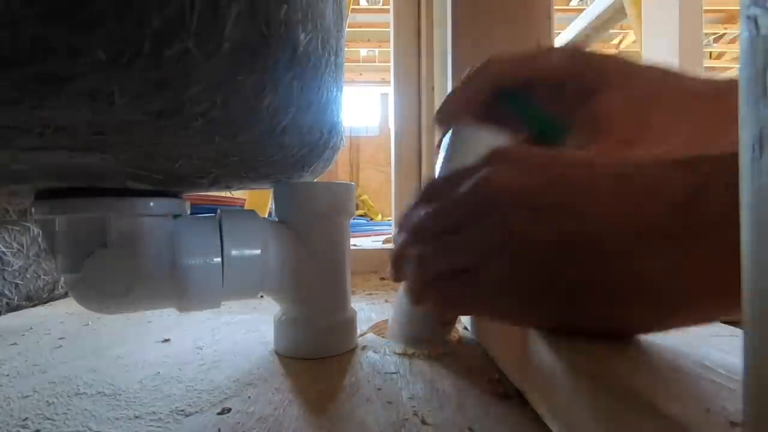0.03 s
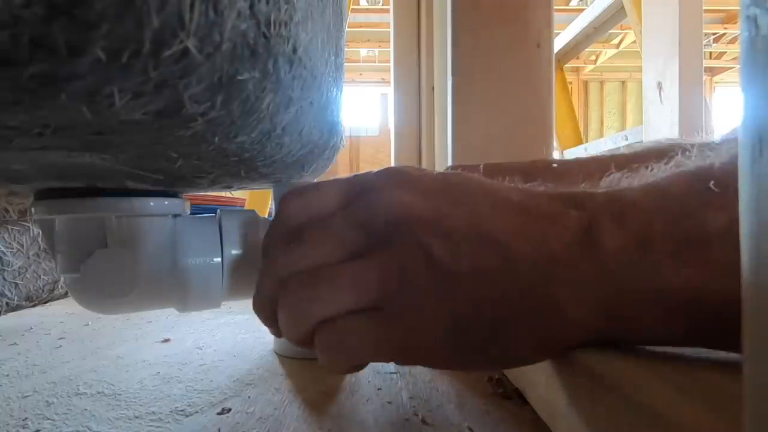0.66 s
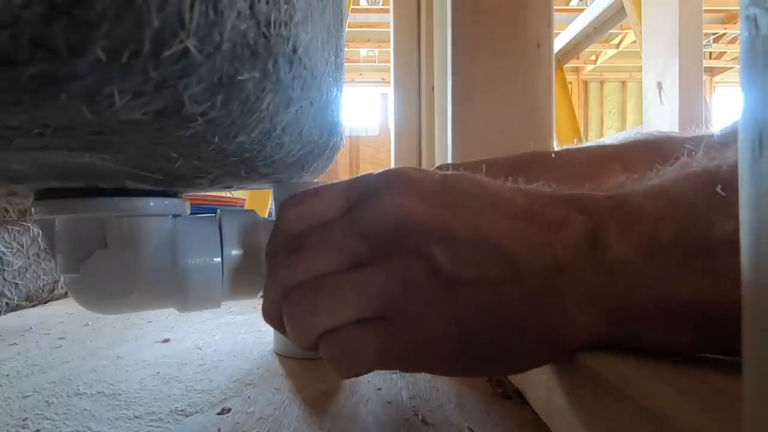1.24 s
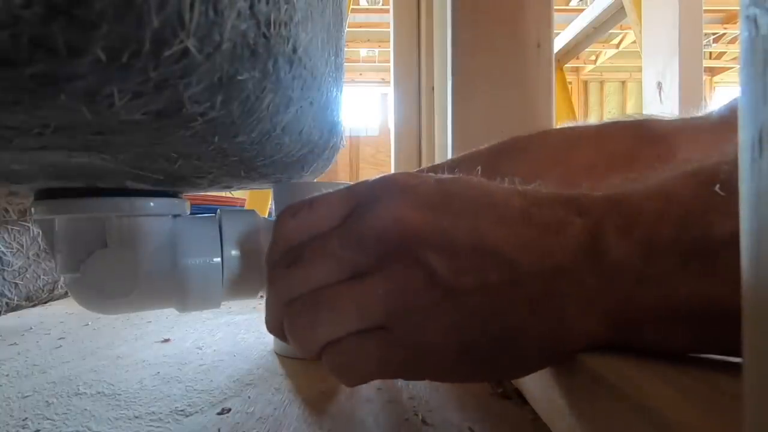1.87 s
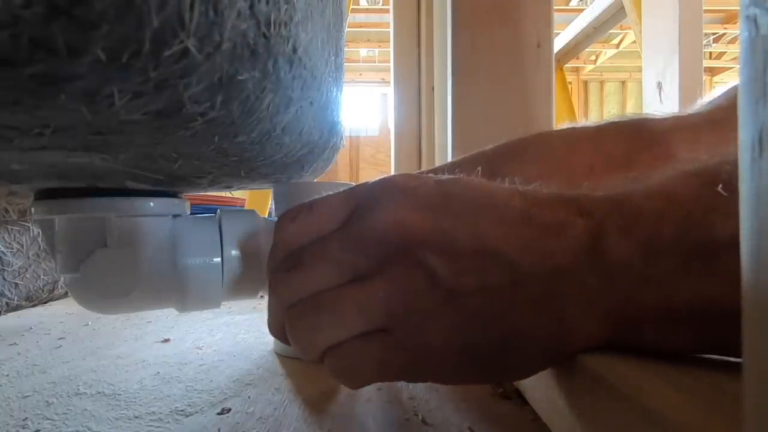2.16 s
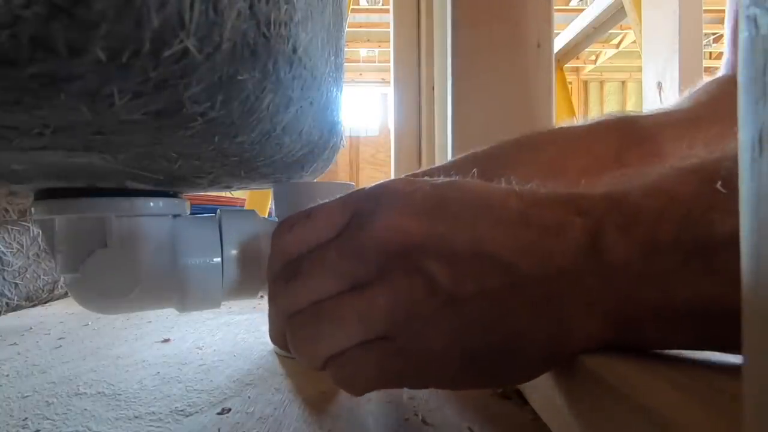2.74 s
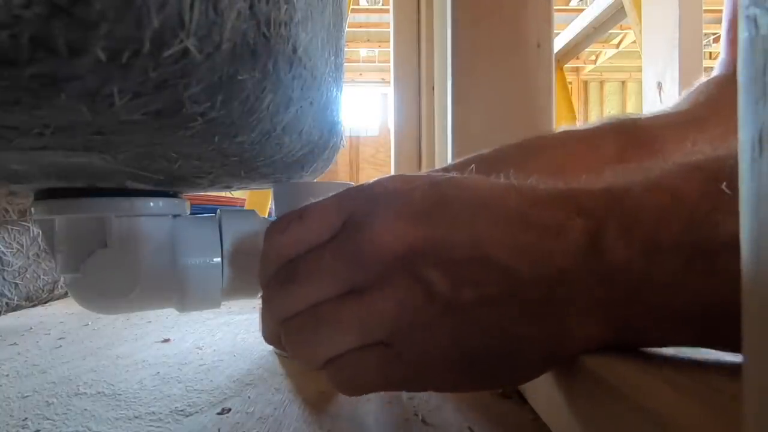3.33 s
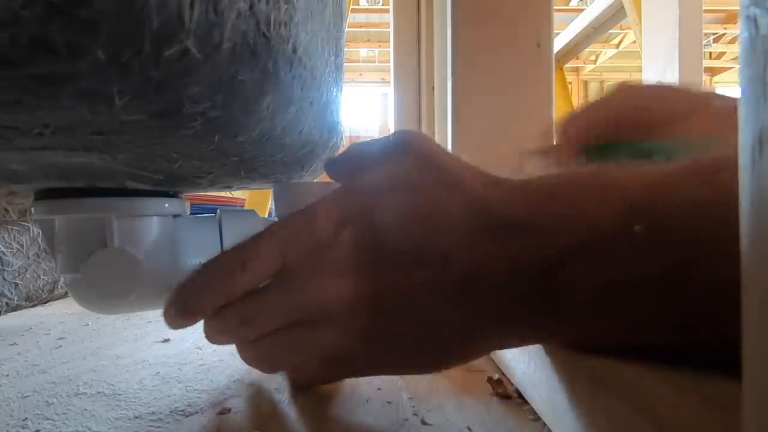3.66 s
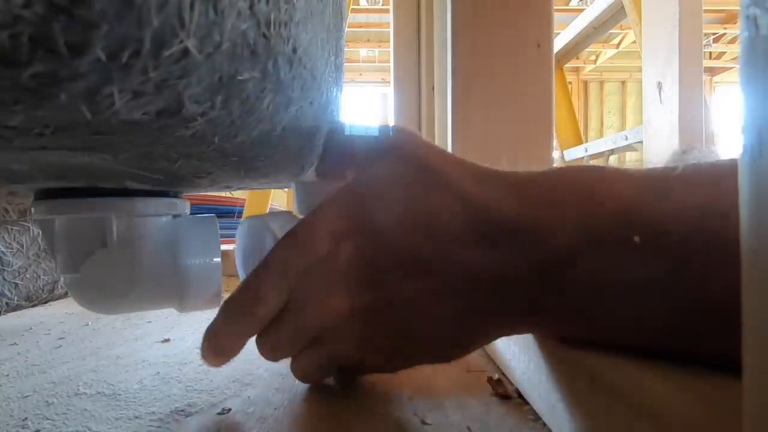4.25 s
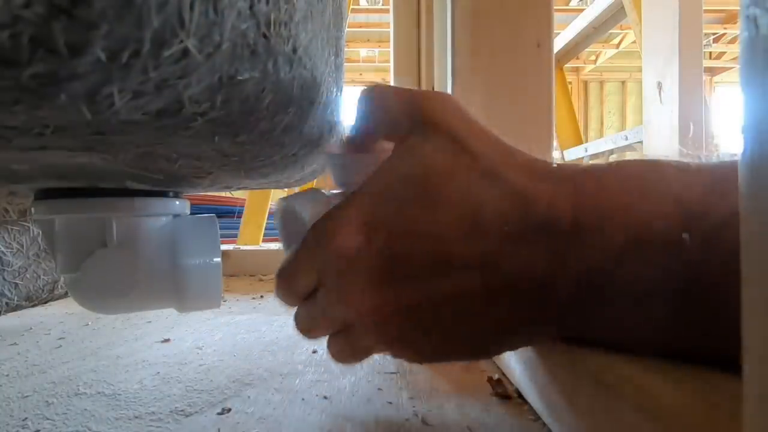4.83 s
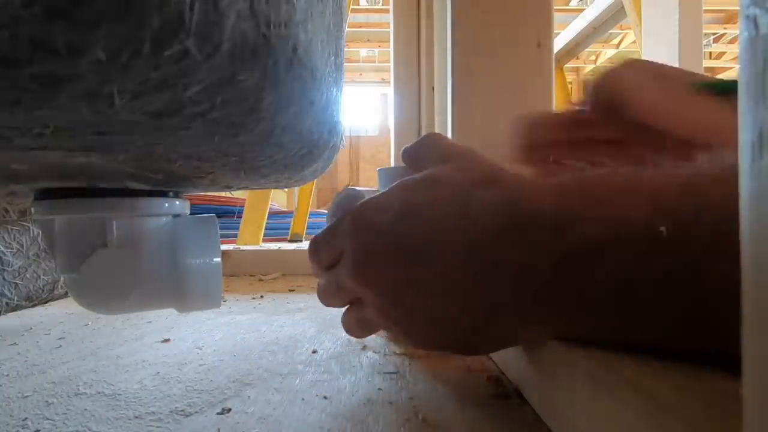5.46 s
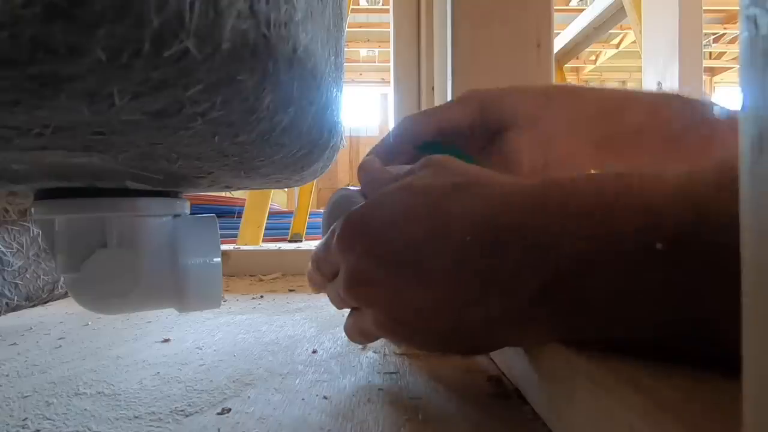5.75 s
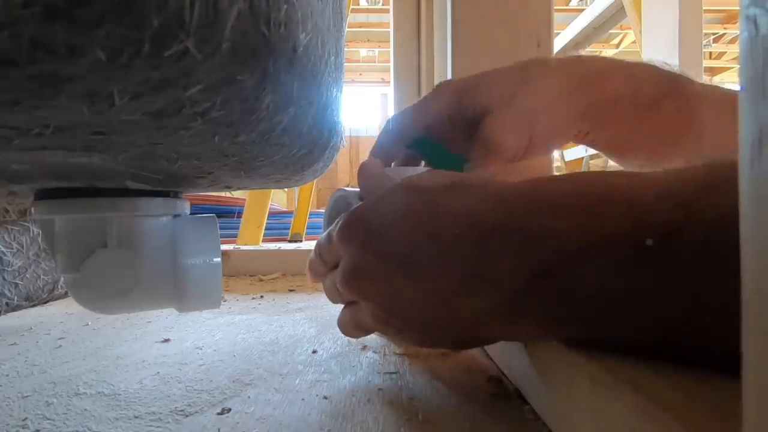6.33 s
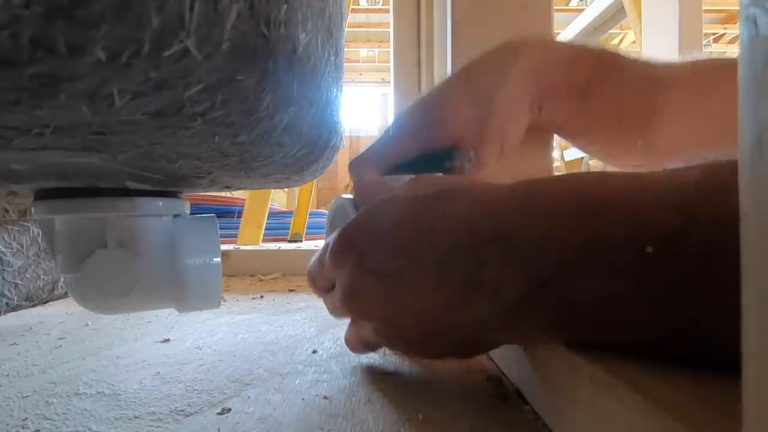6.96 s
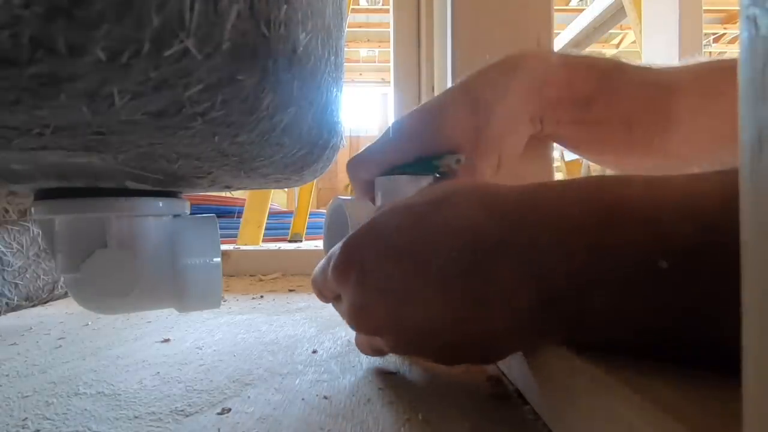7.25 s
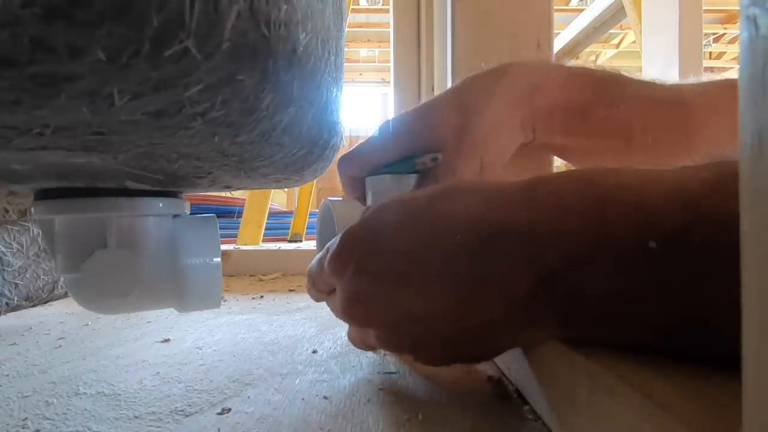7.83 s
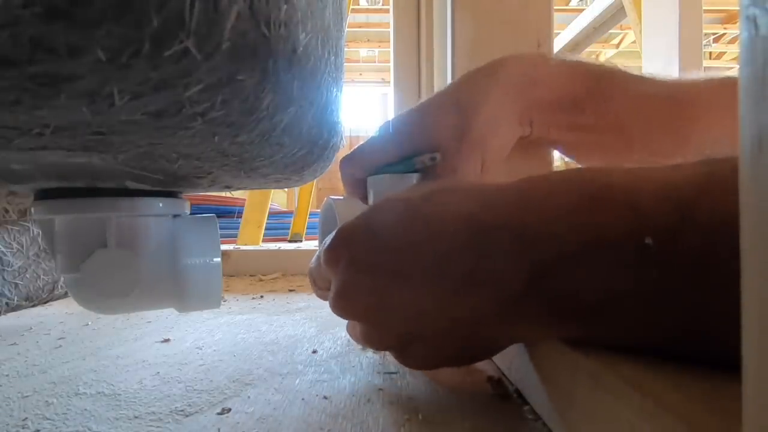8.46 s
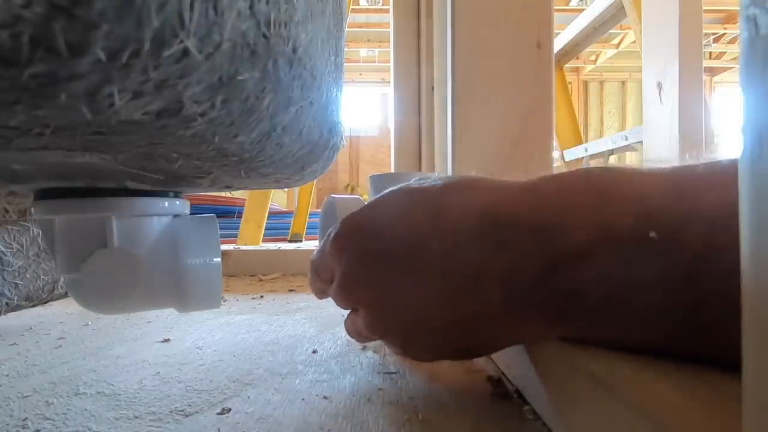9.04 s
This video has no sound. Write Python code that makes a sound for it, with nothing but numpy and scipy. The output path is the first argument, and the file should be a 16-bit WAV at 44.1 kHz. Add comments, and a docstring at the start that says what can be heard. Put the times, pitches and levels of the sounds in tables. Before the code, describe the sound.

Plastic drain fittings are handled close by under a bathtub, in a bare wooden room that rings after each knock over a faint steady hiss. In the first second, hands swish over plastic with a soft low thump and light bumps. Hollow knocks come at about 1 second, with a loud knock and clack at 1.3. Faint taps and rubbing follow, with a small squeak at 1.7. From about 3.8 to 5.1 seconds comes the loudest, busiest stretch: a tight joint judders, creaks and pops, rims clack, and the pipe repeatedly bumps the tub and floor. Lighter ticks and hand slides follow around 5.7 to 6.5. At 7 seconds the pipe drops into its socket with a hollow ringing knock. Four small ticks come between 7.7 and 8.2, then a gritty scrape and short squeak near 8.6, and soft bumps just after 9 seconds.

```python
"""Under a bathtub in an unfinished timber-framed house, plastic drain fittings are pushed together by hand.
The pipe bumps the hollow tub and the floor, ringing both and the air inside it. Fittings clack rim on rim.
A tight joint sticks and slips: it judders, creaks, rasps, squeaks and ticks. Hands slide over the plastic.
The bare room rings on after each knock, over a faint steady hiss."""
import sys
import numpy as np
from scipy import signal
from scipy.io import wavfile

SR = 44100
rng = np.random.default_rng(int(sys.argv[2]) if len(sys.argv) > 2 else 0)


def write(x):
    x = np.atleast_2d(x).T
    wavfile.write(sys.argv[1], SR, np.round(np.clip(x, -1, 1) * 32767).astype(np.int16))


N = 405387
T = np.arange(N) / SR
APART = np.array([[1], [-1]])   # left plus, right minus
EDGES_HZ = np.geomspace(20, 13000, 24)
CENTRES_HZ = np.sqrt(EDGES_HZ[1:] * EDGES_HZ[:-1])
SLIDE_RELEASE, TWIST_RELEASE = 1.38, 0.92   # ease-out time over ease-in time

# Pipe bumping tub and floor. Each row: start in seconds, middle, bass and treble in dB, air note in Hz.
KNOCKS = [(0.02, -45, -42.5, -60, 215), (0.574, -36, -30.5, -74, 214.5), (0.655, -40, -28.5, -83, 173),
          (0.689, -42, -36, -70, 323), (0.781, -51, -31, -66, 199), (0.964, -49, -34, -68, 231.5),
          (1.024, -29.5, -21.5, -39.5, 274), (1.035, -20, -23, -80, 490), (1.238, -13, -23.5, -48, 438),
          (1.257, -9, -13, -37, 291.3), (1.69, -59, -43.5, -65, 210), (1.979, -64, -49, -60, 270),
          (2.349, -62, -49, -59, 149.4), (2.56, -54, -43.5, -54, 233), (2.634, -61, -42.5, -62, 159.4),
          (2.658, -34.5, -47, -49, 764), (2.905, -39, -36, -45, 233), (3.083, -47, -41, -46, 232.5),
          (3.159, -65, -50, -62, 223), (3.294, -61, -54, -61, 169), (3.5, -55, -43.5, -58, 192),
          (3.599, -31.5, -36.5, -40, 713), (3.626, -50, -34, -32, 226), (3.762, -32, -37, -35, 680),
          (3.858, -36, -23.5, -41, 394), (3.892, -16.5, -19.5, -24, 438), (3.924, -9, -12.5, -24.5, 377),
          (4.04, -22.5, -26, -46, 334), (4.273, -12, -19.5, -37, 517), (4.293, -11, -20, -28, 536),
          (4.431, -8.5, -20.5, -36, 483), (4.45, -43, -17, -31, 359), (4.527, -28, -16.5, -38, 546),
          (4.605, -13.5, -12, -35, 255), (4.624, -7, -22, -41, 564), (4.7, -21, -19, -36, 221),
          (4.721, -61, -14.5, -31, 227.3), (4.763, -15.5, -26, -56, 562), (4.876, -19.5, -15, -44, 317),
          (5.055, -11, -17.5, -35, 320), (5.668, -35, -34, -38, 137.2), (6.964, -15.5, -20, -32, 243.3),
          (8.58, -37, -35, -45, 179.3), (8.999, -47, -40, -41.5, 120), (9.152, -32, -37, -44, 225)]
# Hand sliding on plastic. Each row: start and hold in seconds, level in dB, ease-in in seconds.
SLIDES = [(0.01, 0.03, -41.5, 0.053), (0.145, 0.026, -43.5, 0.024), (0.28, 0.04, -43.5, 0.13),
          (1.683, 0.031, -50, 0.011), (2.0, 0.014, -55, 0.013), (2.16, 0.022, -54, .015),
          (2.37, 0.03, -56, 0.018), (2.56, 0.023, -52.5, 0.013), (3.4, 0.018, -64, 0.017),
          (3.437, 0.053, -43.5, 0.0073), (3.54, 0.27, -42, 0.14), (4.24, 0.0026, -33, 0.0059),
          (4.39, 0.2, -42.5, 0.091), (5.1, 0.26, -49.5, 0.15), (5.635, 0.027, -47.5, 0.098),
          (6.085, 0.035, -44.5, 0.021), (6.38, 0.09, -47, 0.058), (6.89, 0.035, -46, 0.053),
          (6.953, 0.0076, -34.5, 0.0089), (8.52, 0.056, -50, 0.11), (9.0, 0.22, -56, 0.15)]
# Stereo width of close sounds. Each row: frequency in Hz, side minus mid in dB.
CLOSE_WIDTH = [(60, -23), (100, -35), (150, -6.5), (195, 8), (240, 0.5), (320, -18), (450, -10), (900, -20),
               (1800, -2), (4000, -14.5), (8000, 5.5), (11000, 8)]


def from_db(db):
    """Decibels to gain."""
    return 10 ** (np.asarray(db) / 20)


def at_hz(points, hz):
    """Read a table on a log-frequency axis."""
    freqs_hz, values = np.transpose(points)
    return np.interp(np.log(hz), np.log(freqs_hz), values)


def clicks(times, sizes):
    """One impulse at each time."""
    out = np.full(N, 1e-18)
    out[np.clip(np.round(np.asarray(times) * SR).astype(int), 0, N - 1)] = sizes
    return out


def random_times(per_s):
    """Independent events at a mean rate."""
    return np.flatnonzero(rng.random(N) < per_s / SR) / SR


def wander(rate_hz):
    """Smooth random drift of spread 1."""
    slow = signal.sosfilt(signal.butter(2, rate_hz, fs=SR, output="sos"), rng.standard_normal(N + SR))[SR:]
    return slow / slow.std()


def dying(times, sizes, t60_s, rise_s):
    """Envelope of blows whose energy builds, then dies away."""
    fall = np.exp(-2 * np.log(1000) / (t60_s * SR))
    rise = np.exp(-1 / (rise_s * SR))
    energy = signal.lfilter([1], [1, -fall], clicks(times, sizes ** 2))
    return np.sqrt(signal.lfilter([1 - rise], [1, -rise], energy))


def strokes(rows, release_ratio):
    """Envelope of strokes that ease in, hold and ease out."""
    power = np.zeros(N)
    for start_s, hold_s, db, ease_s in rows:
        away_s = np.maximum(start_s - T, 0) + np.maximum(T - start_s - hold_s, 0) / release_ratio
        power += from_db(db) ** 2 * np.exp(-2 * np.minimum(away_s / ease_s, 20))
    return np.sqrt(power)


def noise_bands(width, size=N):
    """Stereo noise bands of rms 1, as wide as the table says."""
    white, bands = rng.standard_normal((2, 2, size + SR // 4)), []
    for k, hz in enumerate(CENTRES_HZ):
        sos = signal.butter(2, EDGES_HZ[k:k + 2], "band", fs=SR, output="sos")
        mid, side = signal.sosfilt(sos, white[k % 2])[:, -size:]
        band = mid + from_db(at_hz(width, hz)) * side * APART
        bands.append((band / band.std()).astype(np.float32))
    return np.array(bands)


def band_gains(spectrum):
    """Band gains for a total rms of 1, from rows of Hz and relative density in dB."""
    gains = from_db(at_hz(spectrum, CENTRES_HZ)) * np.sqrt(CENTRES_HZ)
    return gains / np.linalg.norm(gains)


def coloured(bands, spectrum):
    """Steady noise with the given spectrum."""
    return np.tensordot(band_gains(spectrum).astype(np.float32), bands, 1)


def ring(drive, hz, t60_s):
    """One mode: a unit click starts a decaying sine of height 1."""
    radius, angle = from_db(-60 / (t60_s * SR)), 2 * np.pi * hz / SR
    return signal.lfilter([0, radius * np.sin(angle)], [1, -2 * radius * np.cos(angle), radius ** 2], drive)


def gripped_ring(times, sizes, hz, t60_s, detune):
    """One mode struck repeatedly; the hands load it differently each time, shifting its pitch."""
    out, t = np.zeros(N + SR), T[:int(min(t60_s, 1) * SR)]
    fade = from_db(-60 * t / t60_s)
    pitches_hz = hz * np.exp(detune * rng.standard_normal(len(times)))
    for start_s, size, pitch_hz in zip(times, sizes, pitches_hz):
        start = round(start_s * SR)
        out[start:start + len(t)] += size * fade * np.sin(2 * np.pi * pitch_hz * t)
    return out[:N]


def blow_strength(blows, hz, bass_hz=260, middle_hz=650, treble_hz=3500):
    """Drive of each blow at one pitch: soft heavy blows feed the bass, sharp ones the treble."""
    return from_db([at_hz([(bass_hz, bass_db), (middle_hz, middle_db), (treble_hz, treble_db)], hz)
                    for _, middle_db, bass_db, treble_db, *_ in blows])


def struck(blows, modes):
    """Every blow rings the same modes, of alternating sign."""
    times = np.array(blows)[:, 0]
    return sum((-1) ** k * ring(clicks(times, from_db(db) * blow_strength(blows, hz)), hz, t60_s)
               for k, (hz, db, t60_s) in enumerate(modes))


def crowded_modes(bands, blows, spectrum, decay, rise_cycles):
    """Modes too close to tell apart ring as noise; the lows swell later and last longer."""
    times, out = np.array(blows)[:, 0], np.zeros((2, N))
    for band, hz, gain in zip(bands, CENTRES_HZ, band_gains(spectrum)):
        out += band * dying(times, gain * blow_strength(blows, hz), at_hz(decay, hz), rise_cycles / hz)
    return out


def radiated(x, lowest_hz=70):
    """Small bodies radiate little below their lowest resonance."""
    return signal.sosfilt(signal.butter(2, lowest_hz, "high", fs=SR, output="sos"), x)


def from_left(x, tilt_db=0.22, lag_s=0.000018, body_hz=400, body_q=0.59, body_share=0.089):
    """Work slightly to the left arrives there first and louder, most of all the tub's low notes."""
    body = signal.lfilter(*signal.iirpeak(body_hz, body_q, fs=SR), x)
    left, right = x + body_share * APART * body
    return np.array([left, np.interp(T - lag_s, T, right)]) * from_db(tilt_db * APART)


def still_air(level_db=-44):
    """Faint steady hiss over a low rumble."""
    # Air noise. Each row: frequency in Hz, relative density in dB.
    spectrum = [(13, -31), (22, 14.5), (32, -2.5), (58, 1), (224, -4), (255, 6), (299, -9.5), (444, -7),
                (579, -10.5), (1240, -13), (1750, -16.5), (2110, -16), (9980, -22.5), (12000, -25),
                (15600, -62), (22000, -120)]
    # Its width. Each row: frequency in Hz, side minus mid in dB.
    width = [(60, -1.5), (130, 1.5), (270, 0), (580, -2), (1240, -3), (2630, 0.5), (5610, -1), (12000, 1)]
    return from_db(level_db) * coloured(noise_bands(width), spectrum)


def echoes(x, levels, decay, build_s=0.0011):
    """Diffuse reflections, dying away band by band."""
    # Echo width. Each row: frequency in Hz, side minus mid in dB.
    width = [(125, -13), (165, -15), (220, -1), (290, -16), (1000, -11.5)]
    t, response = T[:3 * SR // 2], 0
    for band, hz in zip(noise_bands(width, size=len(t)), CENTRES_HZ):
        tail = band * from_db(-60 * t / at_hz(decay, hz)) * (1 - np.exp(-t / build_s))
        band_share = hz * np.log(EDGES_HZ[1] / EDGES_HZ[0]) / (SR / 2)
        response = response + tail * from_db(at_hz(levels, hz)) * np.sqrt(2 * band_share / np.sum(tail ** 2))
    return signal.fftconvolve(x.mean(axis=0)[None], response, axes=1)[:, :N]


def room(x):
    """Long echoes off bare boards and studs."""
    # Room response. Each row: frequency in Hz, gain in dB.
    levels = [(80, 1), (125, -2), (165, -11), (220, -4), (290, -5.5), (385, -6.5), (510, -7), (675, -9.5),
              (900, -11.5), (1200, -10.5), (1800, -16), (4000, -9.5), (10000, -20)]
    # Its decay. Each row: frequency in Hz, t60 in seconds.
    decay = [(100, 0.89), (350, 1.44), (1000, 1.3), (3000, 1.3), (6000, .8), (10000, .6)]
    return echoes(x, levels, decay)


def tub_gap(x):
    """Quick echoes in the gap under the tub."""
    # Gap response. Each row: frequency in Hz, gain in dB.
    levels = [(500, 12), (2000, -12), (5000, -8.5), (10000, -11)]
    # Its decay. Each row: frequency in Hz, t60 in seconds.
    decay = [(1000, .22), (2000, .1), (6000, .055)]
    return echoes(x, levels, decay)


def forearm(bands):
    """Soft rumble as weight shifts onto the floor."""
    # Leans. Each row: start in seconds, level in dB.
    leans = [(0.273, -28.5), (2.48, -39), (2.92, -42), (3.25, -46), (3.499, -41.5), (9.01, -31.5)]
    # Rumble. Each row: frequency in Hz, relative density in dB.
    spectrum = [(25, -17), (60, 15), (120, -3), (250, -54), (600, -38)]
    times, db = np.transpose(leans)
    return coloured(bands, spectrum) * dying(times, from_db(db), t60_s=0.15, rise_s=0.0045)


def grip(bands, shifts_per_s=5, range_db=(-62, -51.6)):
    """Fingers shift their hold with faint dull thuds."""
    times = random_times(shifts_per_s)
    sizes = from_db(rng.uniform(*range_db, len(times)))
    thud = coloured(bands, [(40, -5), (130, 3), (230, 10), (600, -6), (2000, 6), (8000, -40)])
    return thud * dying(times, sizes, t60_s=0.091, rise_s=0.003)


def sliding(bands, catches_per_s=1500, spread_db=4, pressure_db=1.63, swish_hz=4200, swish_q=1.4):
    """Skin catches and releases the plastic in tiny grains under wavering pressure; quick sweeps swish."""
    # Skin friction. Each row: frequency in Hz, relative density in dB.
    spectrum = [(300, 10.5), (700, 2), (1200, 9.5), (2200, 4), (3000, 1.5), (4500, 4.5), (7000, 5),
                (10000, 2), (12000, -45)]
    # Quick sweeps. Each row: start and hold in seconds, level in dB, ease-in in seconds.
    sweeps = [(0.31, 0.024, -34.5, 0.028), (3.761, 0.0071, -32.5, 0.011), (6.79, 0.022, -46, .015)]
    times = random_times(catches_per_s)
    sizes = from_db(spread_db * rng.standard_normal(len(times)))
    grains = dying(times, sizes, t60_s=0.24, rise_s=0.00014)
    hiss = coloured(bands, spectrum)
    swish = signal.lfilter(*signal.iirpeak(swish_hz, swish_q, fs=SR), hiss[:, ::-1])
    rub = strokes(SLIDES, SLIDE_RELEASE) * hiss + strokes(sweeps, SLIDE_RELEASE) * swish
    pressure = from_db(pressure_db * wander(rate_hz=25))
    return rub * pressure * grains / np.sqrt(np.mean(grains ** 2))


def scratches(bands, snags_per_s=110, spread_db=2, gain_db=-4):
    """Sliding skin snags on grit and the cut rim in sharp little ticks."""
    # Snags. Each row: frequency in Hz, relative density in dB.
    spectrum = [(500, -22), (2000, 3.5), (4500, 1.5), (9000, 4), (12000, -33)]
    times = random_times(snags_per_s)
    sizes = from_db(gain_db + spread_db * np.minimum(rng.exponential(1, len(times)), 3))
    ticks = dying(times, sizes, t60_s=0.005, rise_s=0.0001)
    return strokes(SLIDES, SLIDE_RELEASE) * coloured(bands, spectrum) * ticks


def cupped_hand(centre_hz=2600, swing=0.3, moves_hz=5, half_width_hz=220, gain_db=-11):
    """The hollow of the palm picks out a band of the rubbing, wandering as the hand closes and opens."""
    pitch_hz = centre_hz * np.exp(swing * wander(moves_hz))
    phase = 2 * np.pi * np.cumsum(pitch_hz) / SR
    band = wander(half_width_hz) * np.sin(phase) + wander(half_width_hz) * np.cos(phase)
    return from_db(gain_db) * strokes(SLIDES, SLIDE_RELEASE) * band


def rasp(bands, grit_db=1, grit_hz=300):
    """The dry cut rim drags over the socket wall in gritty spurts."""
    # Scrapes. Each row: start and hold in seconds, level in dB, ease-in in seconds.
    scrapes = [(1.689, 0.021, -47, 0.0026), (8.512, 0.025, -39.5, 0.0019), (8.548, 0.03, -34.5, 0.0058),
               (8.655, 0.041, -47, 0.0062)]
    # Rim friction. Each row: frequency in Hz, relative density in dB.
    spectrum = [(100, 4), (300, 7), (550, 2.5), (850, 3), (1150, 4.5), (1500, 1), (2200, 0.5), (2700, -31),
                (3500, 1), (4500, -18), (5600, -8), (8000, -16), (12000, -45)]
    return strokes(scrapes, TWIST_RELEASE) * coloured(bands, spectrum) * from_db(grit_db * wander(grit_hz))


def squeaks(jitter=0.12, jitter_hz=450, octave_db=-10, flutter_db=4, ease_s=0.0045):
    """Slips lock into a hoarse note and its octave, sagging as the push eases."""
    # Squeaks. Each row: start and hold in seconds, level in dB, first and last pitch in Hz.
    notes = [(1.695, 0.054, -46.5, 1350, 1153), (8.629, .06, -45, 1848, 1584)]
    glide = []
    for start_s, hold_s, _, first_hz, last_hz in notes:
        glide += [(start_s, first_hz), (start_s + hold_s, last_hz)]
    pitch_hz = np.interp(T, *np.transpose(glide)) * (1 + jitter * wander(jitter_hz))
    phase = 2 * np.pi * np.cumsum(pitch_hz) / SR
    tone = np.sin(phase) + from_db(octave_db) * np.sin(2 * phase)
    effort = strokes([(*row[:3], ease_s) for row in notes], TWIST_RELEASE)
    return effort * from_db(flutter_db * wander(jitter_hz)) * tone


def creak(median_gap_s=0.001, unevenness=0.56, grain_db=4, side_db=-34, ease_s=0.0066):
    """Twisted dry plastic sticks and slips in a fast uneven train that rings the socket."""
    # Twists. Each row: start and hold in seconds, level in dB.
    twists = [(1.231, 0.013, -34.5), (3.854, 0.048, -32), (3.888, 0.021, -38), (4.259, 0.032, -37),
              (4.428, 0.0043, -22), (4.595, 0.027, -39), (4.711, 0.068, -36.5), (4.878, 0.032, -29),
              (5.027, 0.034, -34.5)]
    # Socket resonances. Each row: centre and width in Hz, relative gain in dB.
    resonances = [(284, 110, 15.5), (536, 210, 19), (805, 300, 13), (1080, 280, 7), (1480, 130, 11.5),
                  (1960, 260, 6.5), (3700, 550, -4), (4830, 1500, -4.5)]
    gap_draw, size_draw = rng.standard_normal((N // 10, 2)).T
    times = median_gap_s * np.cumsum(np.exp(unevenness * gap_draw))
    inside = times < T[-1]
    drive = clicks(times[inside], from_db(grain_db * size_draw[inside]))
    out = np.zeros((2, N))
    for k, (hz, width_hz, db) in enumerate(resonances):
        resonance = signal.lfilter(*signal.iirpeak(hz, hz / width_hz, fs=SR), drive)
        out += from_db(db) * resonance * ((-1) ** k + from_db(side_db) * APART)
    effort = strokes([(*row, ease_s) for row in twists], TWIST_RELEASE)
    return effort * out / out.std()


def joint_slips(bands, ring_db=4, crowd_db=6.5):
    """The tight hand-held joint gives in small ticks, each ringing its modes."""
    # Slips. Each row: start in seconds, middle, bass and treble in dB.
    slips = [(5.844, -30, -34, -43.5), (7.712, -29, -34, -44), (7.823, -31, -38, -49.5),
             (7.897, -31.5, -33.5, -47.5), (7.985, -27, -31.5, -45.5), (8.204, -28.5, -32.5, -48)]
    # Distinct modes. Each row: frequency in Hz, relative gain in dB, t60 in seconds.
    modes = [(737, -3, 0.027), (894, -2.5, 0.041), (1090, 5, 0.016), (1520, -27, .02), (2220, -1, 0.013),
             (3180, 5, 0.03), (3860, 3.5, 0.042), (5340, -3, 0.02)]
    # Crowded modes. Each row: frequency in Hz, relative density in dB.
    spectrum = [(30, -28), (70, -26), (160, 3.5), (450, -4.5), (900, -0.5), (1400, -2.5), (2200, -3),
                (4000, -1), (6000, 1.5), (10000, -47)]
    # Their decay. Each row: frequency in Hz, t60 in seconds.
    decay = [(100, 0.95), (700, 0.2), (2000, 0.33), (9000, 0.056)]
    crowd = crowded_modes(bands, slips, spectrum, decay, rise_cycles=1.1)
    return from_db(ring_db) * struck(slips, modes) + from_db(crowd_db) * crowd


def pipe_wall(jolts, modes, detune, scatter_db):
    """Short jolts ring the pipe, each with its own balance of modes."""
    times, level_db = np.transpose(jolts)[:2]
    out = np.zeros(N)
    for k, (hz, db, t60_s) in enumerate(modes):
        sizes = from_db(level_db + db + scatter_db * rng.standard_normal(len(times)))
        out += (-1) ** k * gripped_ring(times, sizes, hz, t60_s, detune)
    return out


def judders(swell_cycles=0.69):
    """The turning pipe catches and jumps: each jump rings the wall and gives a dull pop of a few cycles."""
    # Jumps. Each row: start in seconds, wall ring and pop in dB, pop pitch in Hz.
    jumps = [(1.0345, -55, -20, 615), (1.2405, -43, -23, 680), (3.872, -25, -28, 600),
             (3.887, -18.5, -34, 800), (3.8925, -21, -13, 830), (3.9228, -31, -4.5, 786),
             (3.9295, -17, -11, 610), (4.265, -30, -21, 770), (4.2738, -21.5, -10.5, 730),
             (4.2928, -24, -11, 790), (4.302, -31, -10, 726), (4.433, -26, -11, 700),
             (4.6055, -20, -24, 590), (4.61, -20.5, -33, 715), (4.617, -22, -27, 700),
             (4.626, -24, -35, 600), (4.7, -29, -22, 540), (4.718, -25, -30, 600), (4.732, -30, -32, 600),
             (4.75, -25.5, -31, 700), (4.761, -25, -22, 750), (4.765, -28.5, -18, 726),
             (4.874, -20.5, -16.5, 960), (5.668, -31, -22.5, 950), (5.847, -34, -36, 920)]
    # Wall modes. Each row: frequency in Hz, gain in dB, t60 in seconds.
    modes = [(710, -9.5, 0.063), (810, -12, 0.018), (1065, -11.5, 0.043), (1530, -9.5, 0.018),
             (1767, -1, 0.032), (1970, -2, 0.021), (2080, -5.5, .018), (2520, -13, 0.012),
             (4000, -8.5, .008), (4360, -12, .008)]
    pops, t = np.zeros(N + SR), T[:SR // 20]
    for start_s, _, db, hz in jumps:
        start, age = round(start_s * SR), hz * t / swell_cycles
        envelope = (age * np.exp(1 - age)) ** 2
        pops[start:start + len(t)] += from_db(db) * envelope * np.sin(2 * np.pi * hz * t)
    return pipe_wall(jumps, modes, detune=0.021, scatter_db=1.5) + pops[:N]


def seating():
    """The short pipe drops home in its socket and rings."""
    # The drop. Each row: start in seconds, level in dB.
    drops = [(6.9655, -22)]
    # Short pipe modes. Each row: frequency in Hz, gain in dB, t60 in seconds.
    modes = [(177, -4, 0.19), (304.4, 2.5, 0.15), (435, -22, 0.14), (636, -2, 0.19), (868, 2.5, 0.093),
             (1010, -7, .14), (1232, 0.5, 0.067), (1680, 8, 0.0096), (3000, 5, 0.0051), (4800, 1, 0.0045),
             (5840, 5, 0.0074)]
    return pipe_wall(drops, modes, detune=0.0034, scatter_db=0.5)


def fittings(bands, scatter_db=1.5, snap_db=0.5):
    """Rim meets rim: a bright snap, and wall modes that the lossy plastic soon stops."""
    # Clacks. Each row: start in seconds, ring in dB, elbow's share of it (rest is the tee's), snap in dB.
    clacks = [(1.256, -11, 1, -13.5), (3.895, -49, 0.1, -36), (4.452, -39, 0.5, -17.5),
              (4.524, -40, 0.5, -21.5), (4.563, -30, 0.66, -18.5), (4.873, -38, 0.15, -25.5),
              (5.0542, -14.5, 0, -15.5), (5.669, -55, 0.1, -46), (6.963, -23.5, 0.64, -39)]
    # Modes of the two fittings. Each row: frequency in Hz, gain in dB, t60 in seconds.
    tee_modes = [(524, -16, 0.1), (1020, -20, 0.11), (1690, -7, .03), (1730, -1.5, .02), (1807, 9.5, 0.039),
                 (1897, 5.5, 0.03), (2010, -4, 0.039), (2150, -1.5, 0.034), (2634, 10, .02),
                 (2700, 4.5, 0.022), (2880, -11, .02), (3644, -5, 0.016), (4290, 1, 0.024),
                 (4580, 4, 0.014), (5040, -2, 0.029), (5580, -0.5, 0.022)]
    elbow_modes = [(1200, -27, .06), (1850, -19, .03), (2000, -1, 0.023), (2159, -7.5, 0.032),
                   (2780, -3.5, 0.015), (2970, -12, .02), (3350, -15, 0.02), (3950, -13.5, 0.051),
                   (4170, -10, 0.027), (5640, 0.5, 0.0066), (6120, 6.5, 0.0071), (7260, -14, 0.0087)]
    times, ring_db, elbow_share, edge_db = np.transpose(clacks)
    walls = np.zeros((2, N))
    for modes, share in ((tee_modes, 1 - elbow_share), (elbow_modes, elbow_share)):
        drive = clicks(times, from_db(ring_db) * share)
        for k, (hz, db, t60_s) in enumerate(modes):
            aim_db = rng.normal(0, scatter_db, (2, 1))
            walls += from_db(db + aim_db) * (-1) ** k * ring(drive, hz, t60_s)
    snap = coloured(bands, [(100, -35), (700, 8), (2000, 6.5), (3000, 9), (4300, 1), (6000, 7.5),
                            (7500, 14.5), (10000, -1.5), (12000, -11)])
    return walls + snap * dying(times, from_db(edge_db + snap_db), t60_s=0.015, rise_s=0.0013)


def floorboards(hz=196, t60_s=0.63, gain_db=-26):
    """Bumps rock the floor sheet, which pushes air up on one side and draws it down on the other."""
    drive = clicks(np.array(KNOCKS)[:, 0], blow_strength(KNOCKS, hz))
    return from_db(gain_db) * ring(drive, hz, t60_s) * np.array([[1], [-0.5]])


def air_sway():
    """Bumps set the air under the tub swaying sideways, opposite in left and right."""
    # Air modes of the gap. Each row: frequency in Hz, gain in dB, t60 in seconds.
    modes = [(212, -4.5, 0.41), (234.2, -2.5, 0.22)]
    return struck(KNOCKS, modes) * APART


def pipe_air(ring_cycles=36, swell_cycles=10, linger_cycles=125, linger_db=-18):
    """Air in the pipe swells into a short note, tuned by how the hands cover its ends; a little lingers."""
    out, t = np.zeros(N + SR), T[:SR * 3 // 4]
    for knock in KNOCKS:
        start, hz = round(knock[0] * SR), knock[4]
        cycles = hz * t
        fade = from_db(-60 * cycles / ring_cycles) + from_db(linger_db - 60 * cycles / linger_cycles)
        envelope = fade - fade[0] * from_db(-60 * cycles / swell_cycles)
        out[start:start + len(t)] += blow_strength([knock], hz) * envelope * np.sin(2 * np.pi * cycles)
    return out[:N]


def wall_push(gain_db=-2.5):
    """First push of the wall at the contact, gone in milliseconds."""
    # Contact modes. Each row: frequency in Hz, relative gain in dB, t60 in seconds.
    modes = [(590, 8.5, 0.0038), (1030, 7, 0.0057), (1720, -28, 0.011), (4500, -28, 0.0033)]
    return from_db(gain_db) * struck(KNOCKS, modes)


def touches(settle_s=0.01008, spread=0.155, middle_db=-8, bass_db=-2, treble_db=-20):
    """Each bump touches twice: the rim first, then the pipe's weight, softer and duller."""
    waits_s = settle_s * np.exp(spread * rng.standard_normal(len(KNOCKS)))
    settles = [(start_s + wait_s, middle + middle_db, bass + bass_db, treble + treble_db, hz)
               for (start_s, middle, bass, treble, hz), wait_s in zip(KNOCKS, waits_s)]
    return KNOCKS + settles


def tub_thud(bands, blows, gain_db=-0.5):
    """The shell's crowded modes answer each blow with a noisy thud."""
    # Crowded modes. Each row: frequency in Hz, relative density in dB.
    spectrum = [(25, -14), (70, -9.5), (125, -1), (165, 2.5), (220, 3.5), (310, 5.5), (430, -1.5),
                (620, -3.5), (890, -5.5), (1185, -1.5), (1500, -14), (2000, -6), (2800, -8), (5000, -11.5),
                (8000, -4), (11000, -54)]
    # Their decay. Each row: frequency in Hz, t60 in seconds.
    decay = [(100, 0.3), (300, 0.27), (700, 0.13), (1500, 0.078), (3000, 0.1), (9000, 0.035)]
    return from_db(gain_db) * crowded_modes(bands, blows, spectrum, decay, rise_cycles=0.42)


def tub_ring(blows, gain_db=-10.5, scatter_db=2.5, spread_s=0.001957, detune_per_khz=0.036):
    """Each bump lands on another spot, so each mode gets its own strength, delay and pitch."""
    # Modes of the shell and the hollow under it. Each row: frequency in Hz, gain in dB, t60 in seconds.
    modes = [(104.5, -23, 0.49), (127.5, -13.5, 0.24), (155, -6, 0.11), (188.2, -10.5, 0.36),
             (225.3, 2, 0.38), (254.3, 4.5, 0.071), (288.4, -9, 0.34), (316.8, -6.5, 0.2),
             (346.7, -4.5, 0.34), (381, -12, 0.25), (429, -13.5, 0.27), (483, -5, 0.2), (511, -10, 0.15),
             (567, -1.5, 0.19), (621.3, -5.5, 0.18), (690, -0.5, 0.1), (776, 1, 0.1), (843, -17, 0.13),
             (866, -2, 0.15), (958, -5.5, 0.23), (1051.4, -3, 0.17), (1138, 2, 0.14), (1517, -4, 0.096)]
    times, out = np.array(blows)[:, 0], np.zeros((2, N))
    draws = rng.standard_normal((len(times), len(modes), 2))
    for k, (hz, db, t60_s) in enumerate(modes):
        sizes = blow_strength(blows, hz) * from_db(db + scatter_db * draws[:, k, 0])
        starts_s = times + spread_s * np.abs(draws[:, k, 1])
        mode = gripped_ring(starts_s, sizes * (-1) ** k, hz, t60_s, detune_per_khz * hz / 1000)
        width = from_db(at_hz(CLOSE_WIDTH, hz))
        side = width * np.gradient(mode) * SR / (2 * np.pi * hz)   # pressure slope from left to right
        out += (mode + side * APART * (-1) ** k) / np.hypot(1, width)
    return from_db(gain_db) * out


def scene(clack_room_db=-18):
    """Blows and friction close by, the room around them, still air behind."""
    blow_bands = noise_bands(CLOSE_WIDTH)
    rub_bands = np.roll(blow_bands, SR, axis=2)   # shifted, so unrelated
    blows = touches()
    tub = wall_push() + tub_ring(blows) + tub_thud(blow_bands, blows)
    bumps = tub + pipe_air() + floorboards() + air_sway()
    jolts = joint_slips(blow_bands) + judders() + seating()
    hands = sliding(rub_bands) + scratches(rub_bands) + cupped_hand()
    twisting = creak() + rasp(rub_bands) + squeaks()
    work = radiated(bumps + jolts + hands + twisting) + grip(rub_bands)
    clacks = radiated(fittings(blow_bands[:, :, ::-1]))
    # The big shell fills the room, the small fittings mostly the gap beneath it.
    reverb = room(work + from_db(clack_room_db) * clacks) + tub_gap(clacks)
    return from_left(work + clacks) + reverb + forearm(rub_bands) + still_air()


def record(dry):
    """Soft clip, then a steep low-pass."""
    cutoff_hz = 11450
    return signal.sosfilt(signal.ellip(10, 0.3, 70, cutoff_hz, fs=SR, output="sos"), np.tanh(dry))


dry = scene()
out = record(dry)
write(out)
```